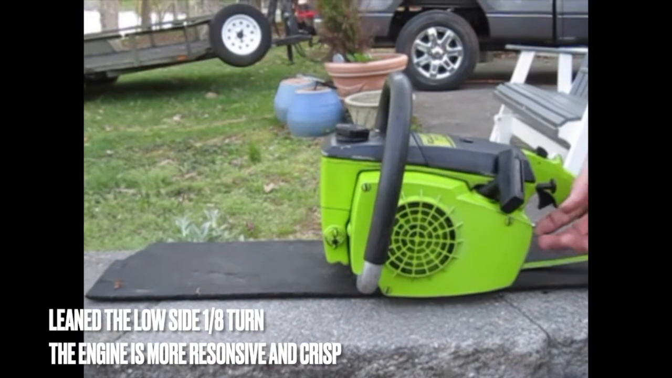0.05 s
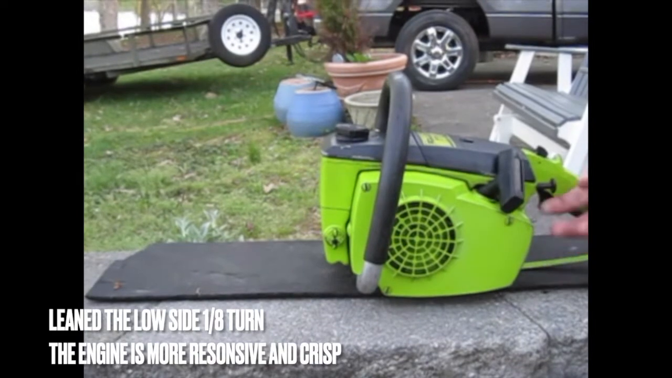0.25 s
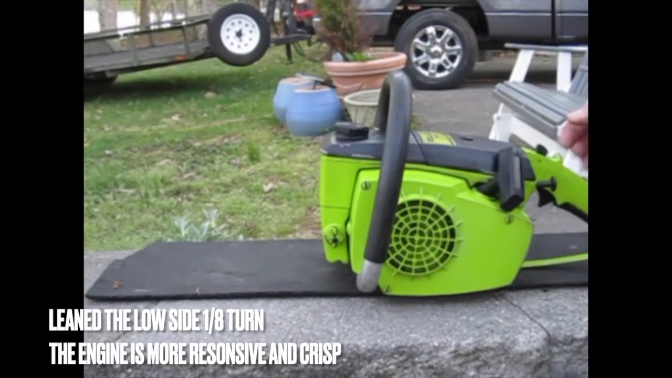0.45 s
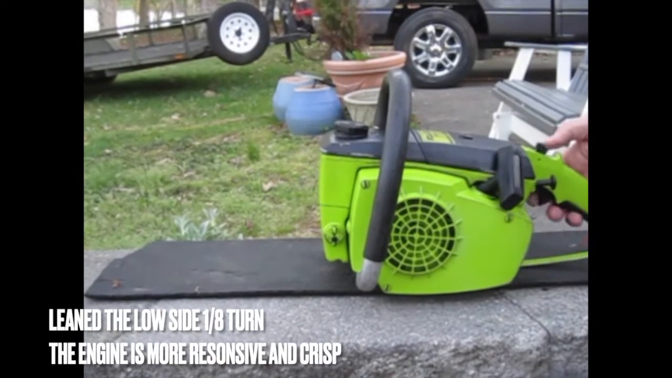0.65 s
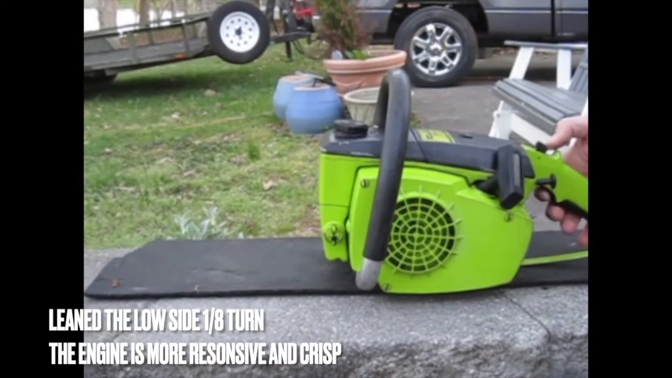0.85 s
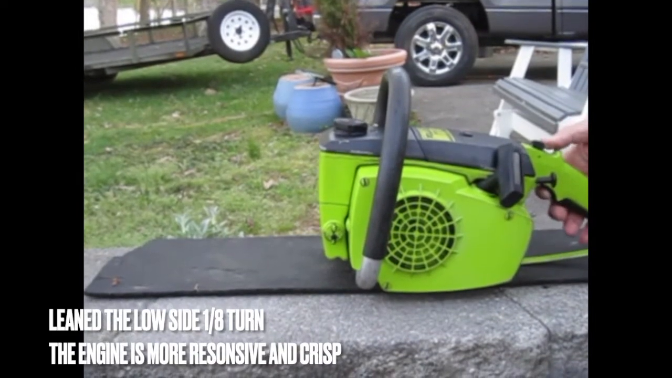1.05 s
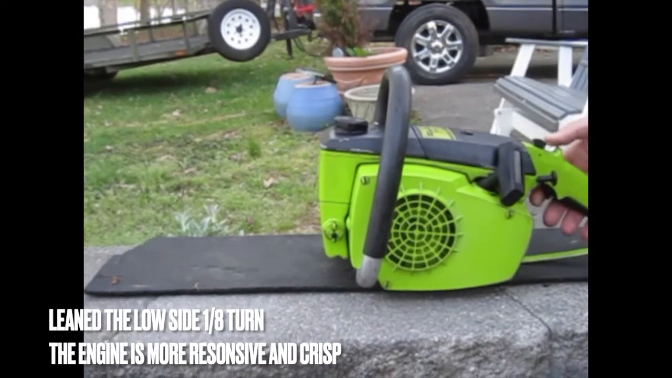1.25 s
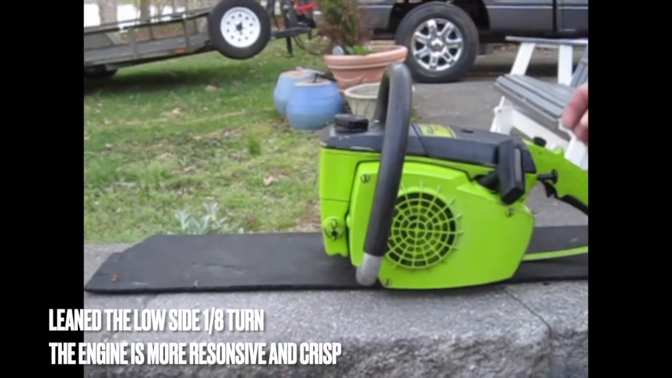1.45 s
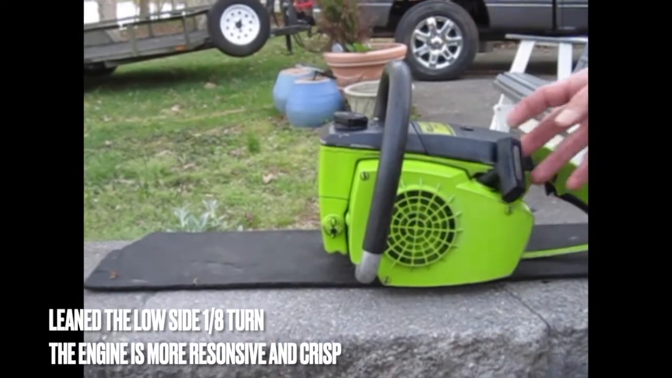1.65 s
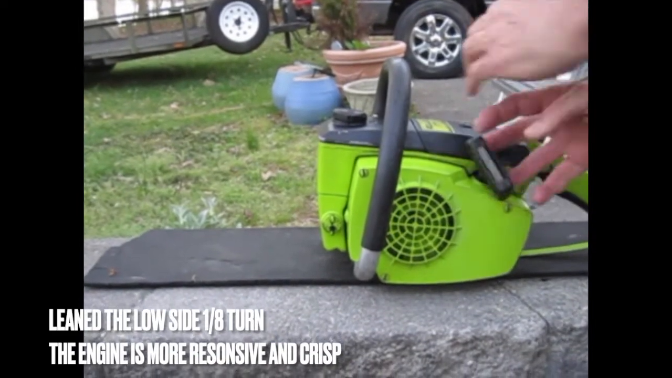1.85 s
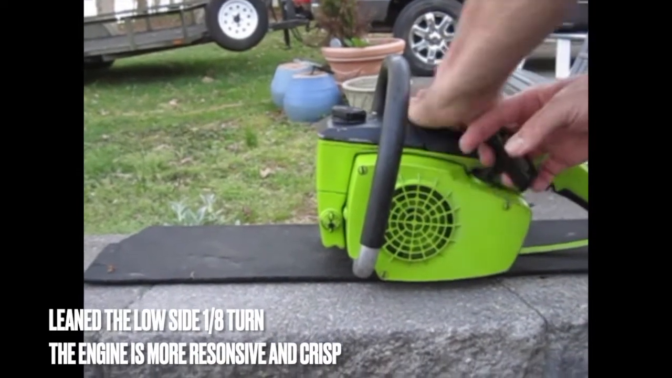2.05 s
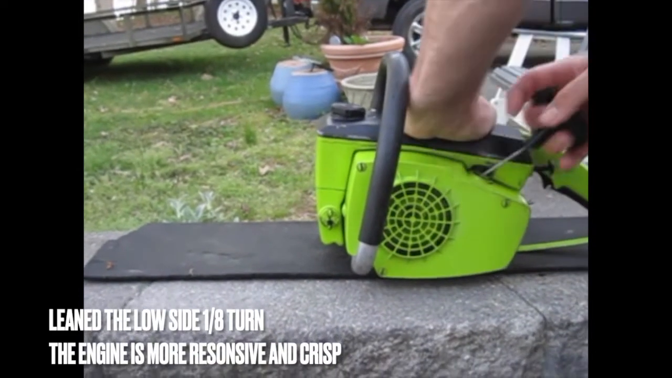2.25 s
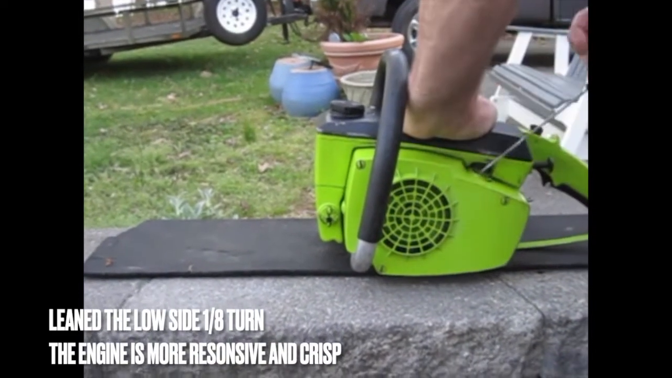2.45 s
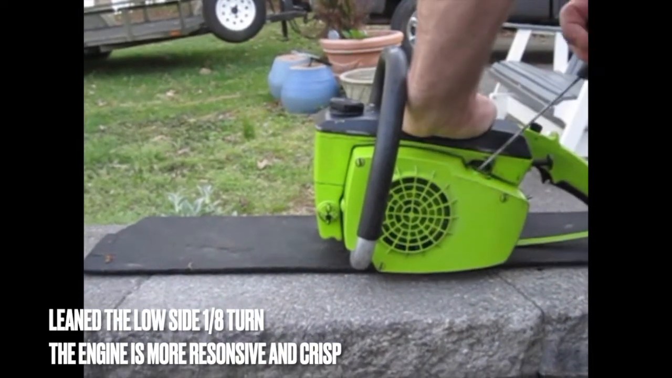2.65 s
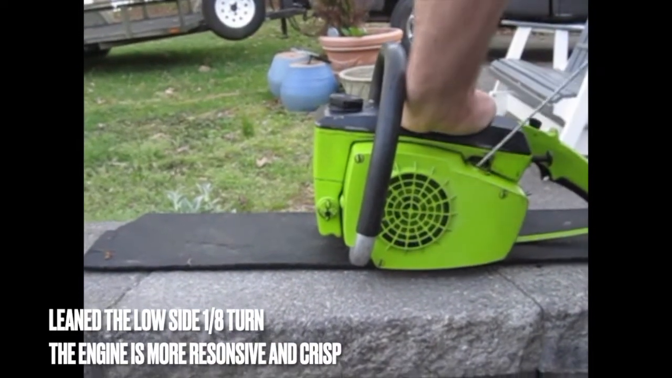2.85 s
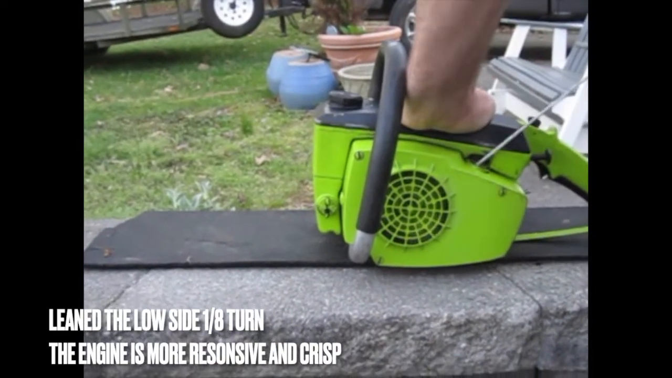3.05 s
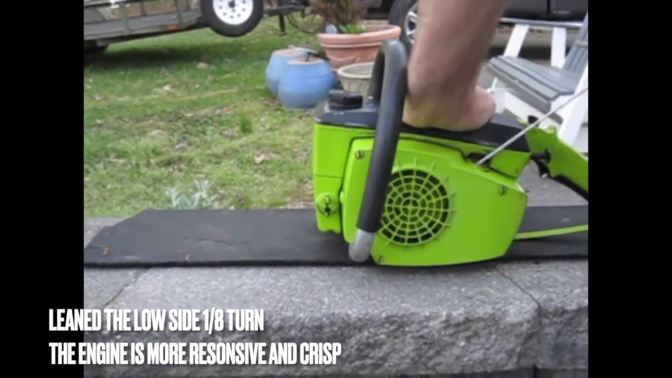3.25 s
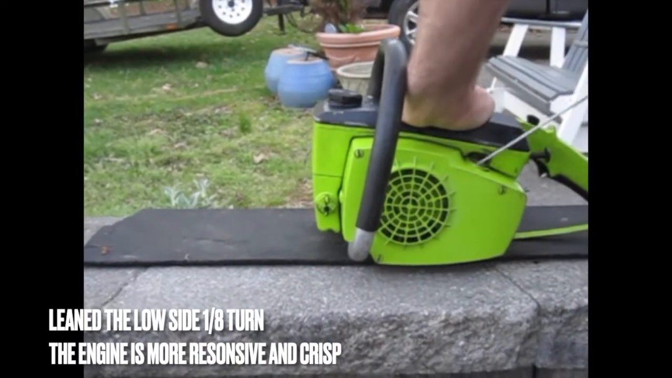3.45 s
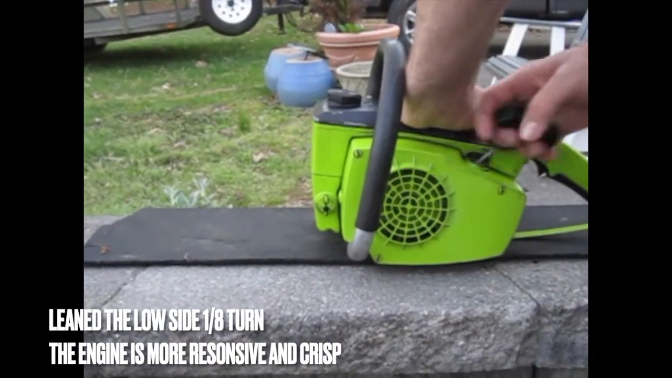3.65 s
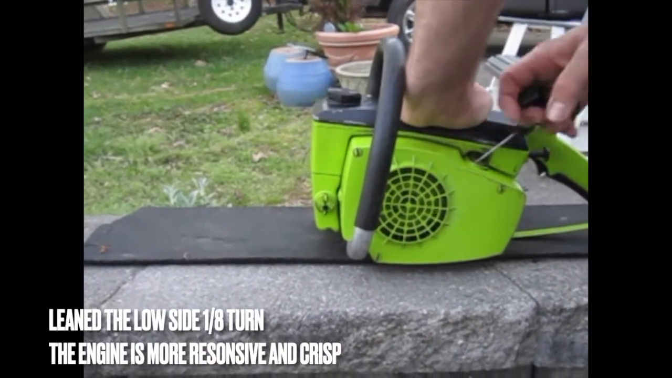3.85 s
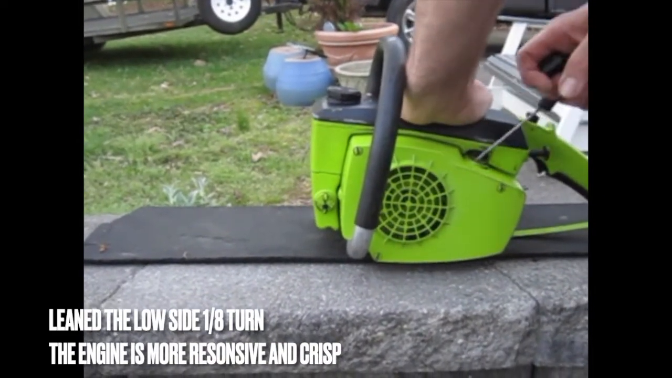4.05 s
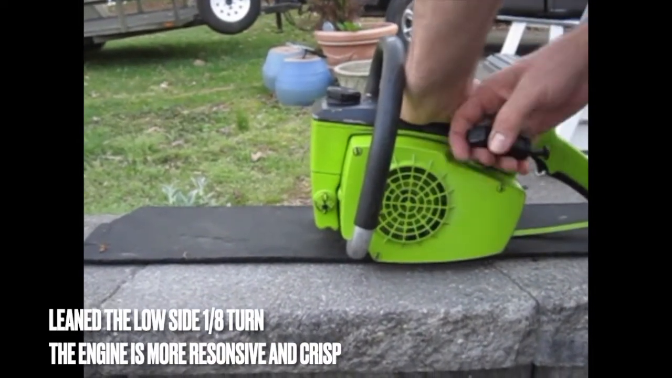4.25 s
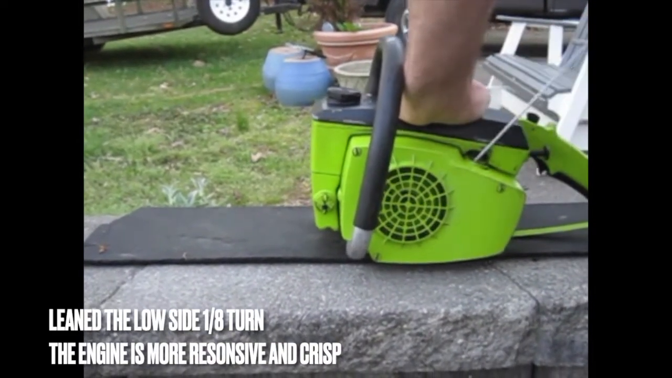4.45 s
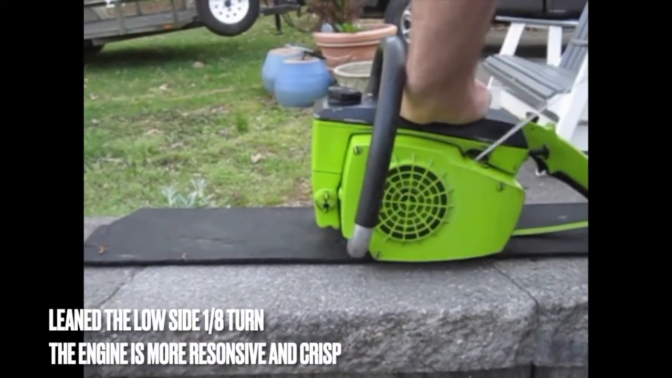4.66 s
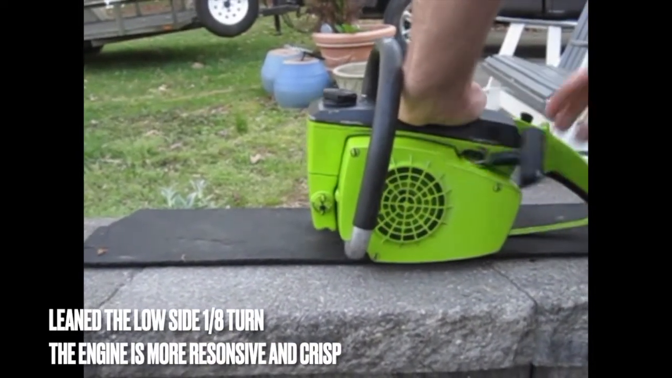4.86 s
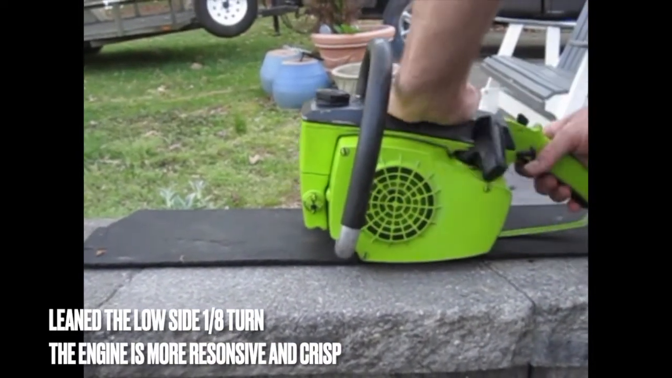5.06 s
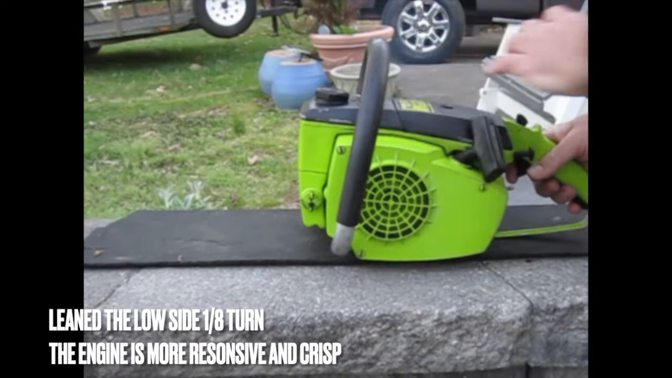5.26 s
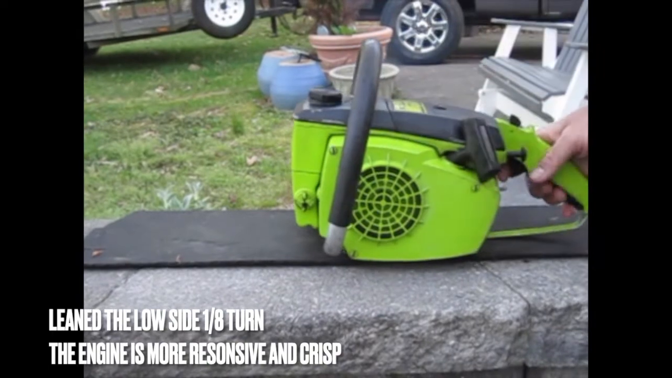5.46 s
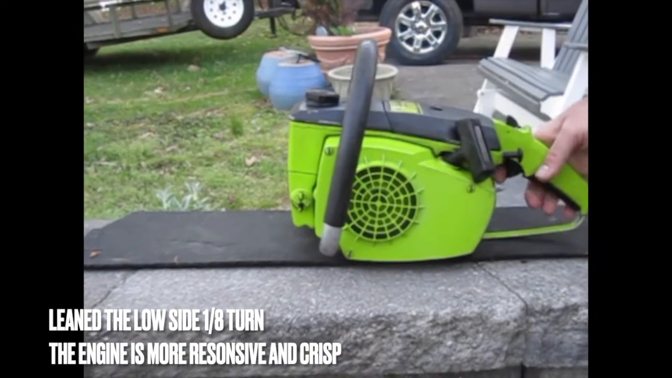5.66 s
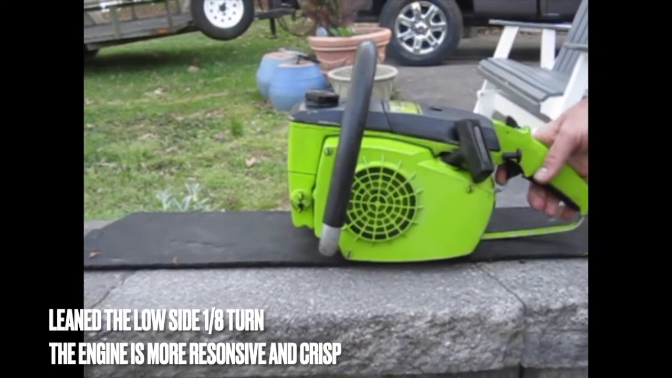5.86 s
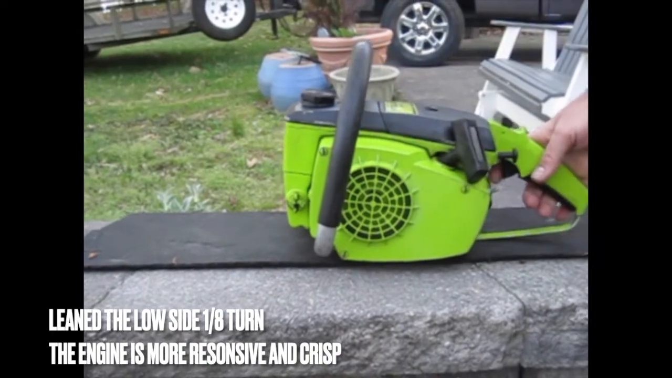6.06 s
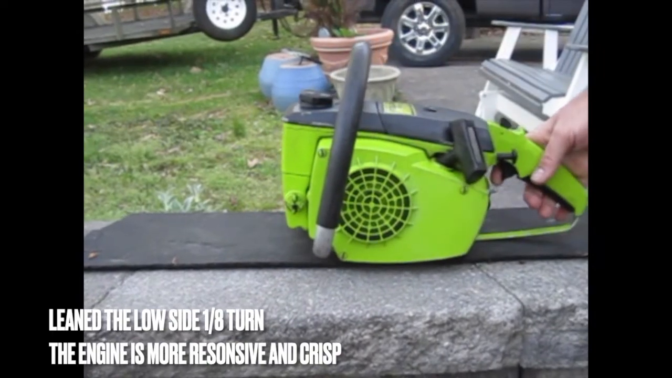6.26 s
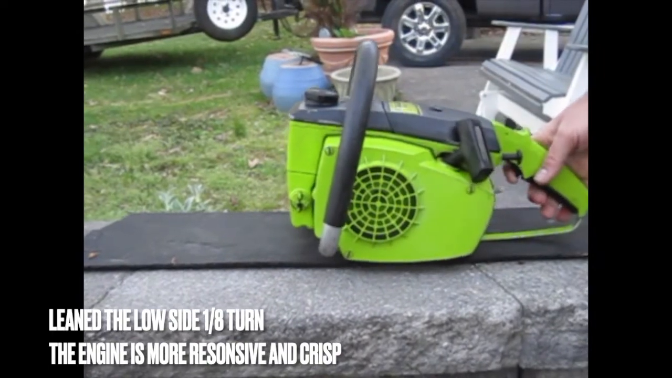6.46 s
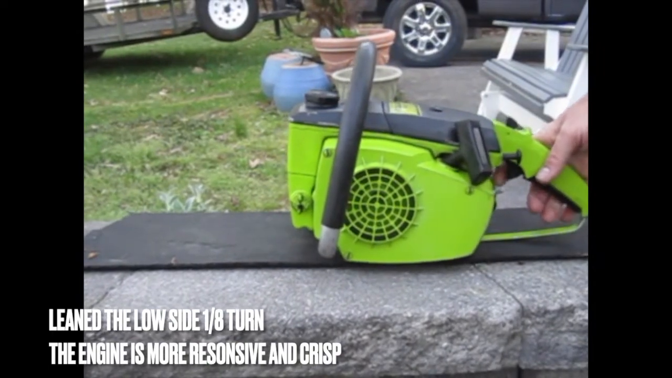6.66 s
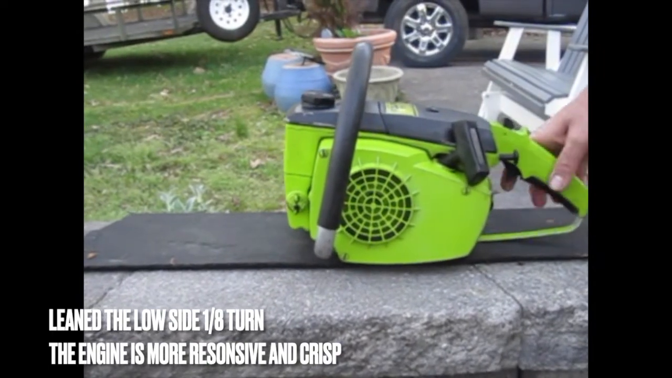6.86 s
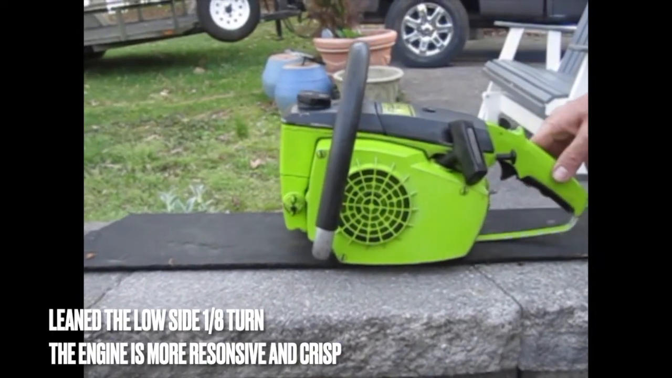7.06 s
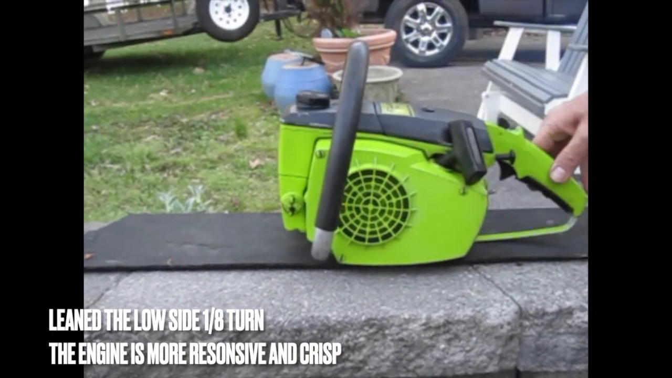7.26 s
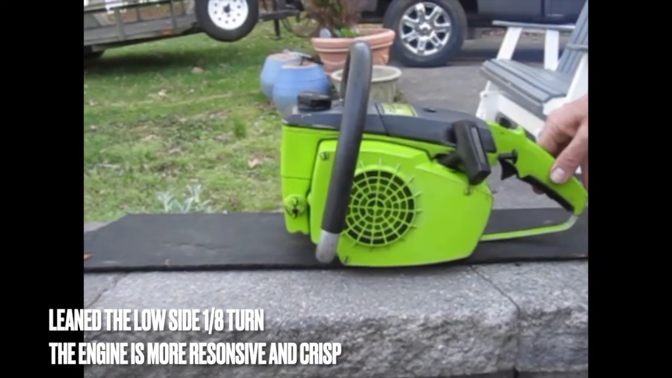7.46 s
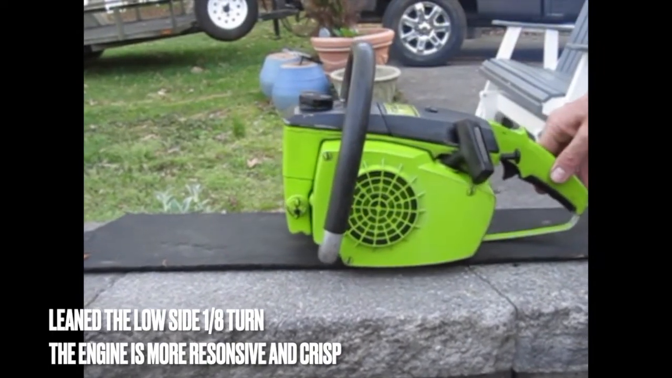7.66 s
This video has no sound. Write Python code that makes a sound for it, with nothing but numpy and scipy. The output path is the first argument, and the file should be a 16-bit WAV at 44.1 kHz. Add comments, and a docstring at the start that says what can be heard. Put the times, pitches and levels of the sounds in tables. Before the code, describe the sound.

In a quiet garden, close up, a few switch clicks and soft hand bumps come first. The starter handle knocks, the cord is eased out with dull compression puffs, then winds back with ratcheting ticks and hollow plastic clacks. A sharp yank fires a small two-stroke engine, which revs up raspy and buzzing with chain whine, coasts down, sputters and pops, takes a short throttle blip, then falls to an uneven idle.

```python
"""A small two-stroke chainsaw on a garden wall, in even outdoor air (shaped noise) with a far-off hum.
Switch clicks and hand bumps (noise bursts) come first; then the starter cord is eased out against compression
and let back with a clatter of drum and pawls (bursts into resonators), and pulled. The engine catches: pulses
locked to the crank excite muffler, crankcase and intake resonances, under hiss and chain whine. It revs up
four-stroking, coasts down popping, is blipped once more and sinks to a popping idle."""
import sys
import numpy as np
from scipy import signal
from scipy.fft import rfft, irfft, next_fast_len
from scipy.io import wavfile
from scipy.ndimage import uniform_filter1d

SR = 44100
rng = np.random.default_rng(int(sys.argv[2]) if len(sys.argv) > 2 else 0)


def store_pcm(level_fs):
    """Save levels as 16-bit WAV."""
    pcm = np.round(np.clip(level_fs, -1, 1) * 32767).astype(np.int16)
    wavfile.write(sys.argv[1], SR, np.atleast_2d(pcm).T)


N = 340011
TIME_S = np.arange(N) / SR

# outdoor air, spectrum shape: freq_hz, density_db
GARDEN = [(15, -43), (25, -9), (84, -3.5), (117, -3), (309, -5.5), (384, -8.5), (416, -5.5), (1040, -3.5),
          (1160, 0.5), (1700, -9), (1840, -4.5), (2000, -7.5), (2160, -8), (5140, -21), (16000, -34.5)]
# far-off machine hum: freq_hz, width_hz, level_db
FAR_HUM = [(1172, 40, -63), (1861, 18, -60), (2160, 40, -66)]
# dull reflections off wall and house: delay_s, level_db
ECHOES = [(.0083, -29.5), (0.0139, -19.5), (0.023, -23.5), (.036, -21.5), (0.072, -26)]
# soft bumps of the hands on the saw: time_s, drive_db
BUMPS = [(1.218, -35), (1.27, -69), (1.34, -55), (1.741, -44), (1.859, -43), (1.947, -34.5), (2.0, -57),
         (3.37, -45.5)]
# cord sliding through its eyelet: start_s, end_s, level_db
SLIDES = [(2.253, 2.37, -44), (2.767, 2.907, -43.5), (3.09, 3.176, -42), (3.352, 3.746, -49.5),
          (3.796, 4.19, -50), (4.409, 4.478, -37)]
# switch and grip clicks: time_s, body_db, bite_over_body_db, treble_over_body_db
CLICKS = [(.101, -34, 2, -19), (.166, -25, 7.5, 4), (.309, -25, -2.5, -20), (.317, -26.5, -5, -38),
          (.948, -41.5, 3, -14), (2.502, -26, -3.5, -29)]
# casing, spectrum shape: freq_hz, density_db
CASING = [(290, -50), (500, -11.5), (974, 7), (1130, 4), (1530, 6), (1790, -9.5), (2160, 0.5), (3590, -5.5),
          (5710, -9), (6230, -2), (8090, -14), (8580, -6.5), (9490, -14), (12300, -12.5), (16000, -29)]
# starter handle and drum knocks as the cord tightens or runs home; ring pitch set by where it hits:
# time_s, body_db, bite_over_body_db, treble_over_body_db, ring_hz, ring_db
CLACKS = [(1.705, -28, -10.5, -44, 967, -19.5), (2.057, -33, -4, -7, 1090, -44),
          (2.077, -17, -7, -12, 977, -16), (2.187, -24, -4.5, -12, 1340, -29),
          (2.294, -16, -2.5, -45, 790, -16.5), (2.763, -29, -7, -32, 1570, -36),
          (2.774, -12.5, -2, -37, 1493, -6), (3.007, -27, -17, -40, 950, -37),
          (3.02, -16, 5, -44, 1416, -12), (3.33, -25.5, 4, -8.5, 1125, -20),
          (3.355, -25, -2, -17, 1420, -30), (3.666, -31, -1, -13, 1150, -30),
          (3.737, -39, 0, -22, 1200, -32), (3.838, -13.5, -1.5, -9, 907, -18),
          (4.002, -17, -5, -54, 1053, -18), (4.009, -18, -6, -54, 1290, -17),
          (4.118, -30, -1.5, -16, 950, -31), (4.127, -30, -3, -16, 1320, -30),
          (4.255, -35, -4, -25.5, 1470, -36), (4.266, -37, -4, -20, 1080, -36),
          (4.386, -14, 2, 0, 1003, -17.5), (4.474, -34.5, 8, 6.5, 1210, -42)]
# pawls ticking over the ratchet as the cord winds back: time_s, body_db
PAWLS = [(3.405, -29), (3.46, -30), (3.514, -30), (3.577, -29), (3.675, -28.5)]
# steel ring modes of the starter: freq_hz, level_db, t60_s
STEEL = [(5592, -7, .12), (6184, -2, .2), (6627, -13, .55), (6912, -10, .08), (7677, -10, .2),
         (8721, -7, .08), (9215, -18, .3), (10207, -8, .11), (12678, -6, .09), (13550, -9, .09),
         (13895, -8, .14), (14116, -5, .1), (14320, -9, .08)]
# small steel parts pinging as the saw is gripped and the handle lifted: time_s, freq_hz, level_db, t60_s
PINGS = [(2.077, 6626, -39.5, .5), (2.077, 11700, -24, 0.028), (2.077, 13930, -36, .07),
         (2.187, 6850, -27, .03), (2.187, 7100, -31, .04), (2.187, 8020, -32, .03)]
# cord dragging the piston over compression: time_s, puff_db
COMPRESSIONS = [(2.322, -18.5), (2.807, -9.5), (3.109, -5), (4.419, -15.5)]
# piston rocking back, puffing and rattling the starter:
# time_s, puff_db, body_db, bite_over_body_db, treble_over_body_db
REBOUNDS = [(2.335, -22.5, -32, -9, -34), (2.366, -32, -28.5, -18, -42), (2.837, -28, -16.5, -5, -45),
            (2.86, -22, -28.5, -10, -25), (2.886, -22, -19, -14, -43), (3.135, -29, -18, 2.5, -31),
            (3.152, -18, -35, -12, -38), (3.16, -27, -19, -10, -44), (3.183, -20.5, -24, -5, -41),
            (3.199, -32, -31, -13, -43), (4.436, -20, -32, -6, -34)]
# muffler under a slow puff of cold air: freq_hz, width_hz, mode_db
COLD_MUFFLER = [(236, 290, -3.5), (373, 248, 0.5), (515, 105, 5.5), (712, 150, 0)]
# flywheel easing toward each new speed: start_s, target_rev_per_s, time_constant_s
STAGES = [(4.4917, 73.04, .063), (4.618, 149.54, .3168), (4.93, 136.42, .2362), (5.03, 155.11, .248),
          (5.205, 35.13, .7497), (5.85, 74.1, .4011), (5.92, 40.12, .4863), (6.488, 108.71, .0454),
          (6.6, 0, 1.331), (7.28, 52.18, .1964), (7.36, 12.88, .9708)]
# open throttle; combustion relative to the plain port puff, skip lost on every other turn:
# start_s, end_s, combustion_db, skip_db
THROTTLE = [(4.48, 4.556, 9, -1), (4.659, 5.03, 4.5, -10.5), (5.042, 5.207, 3, -13), (6.482, 6.594, 5, -9)]
# loud idle pops; combustion relative to the plain port puff: time_s, combustion_db, kick_rev_per_s
POPS = [(5.853, 8.5, 2.35), (5.866, 4.5, 0), (5.99, -11, 0.023), (6.021, 2, 0), (6.077, 4.5, 0.11),
        (6.122, 5.5, 0), (6.183, 3, 0.12), (6.233, 1.5, 0.031), (6.267, -3, 0), (6.283, 1, 0.025),
        (6.301, 1, 0.069), (6.318, 2.5, 0.02), (6.373, 5.5, 0), (6.391, 2, 0.055), (6.429, 7.5, 1.84),
        (6.465, 8.5, 2.03), (6.922, -4, 0.039), (6.973, -0.5, 0), (7.02, -2, 0.047), (7.08, 4.5, 0.058),
        (7.134, 3, 0.02), (7.192, 0, 0.033), (7.208, 4.5, 0), (7.285, 9, 2), (7.385, 3.5, 0),
        (7.42, 1.5, 0.18), (7.456, 1.5, 0.048), (7.493, -0.5, 0), (7.512, 1, 0.036), (7.55, 0, 0.043),
        (7.57, 8, 1.75), (7.652, 10, 2.43)]
# loudness by crank speed, throttle shut: speed_rev_per_s, exhaust_db, hiss_db
LOUDNESS = [(49, -19.5, -41.5), (69, -20.5, -41.5), (89.7, -23, -35), (99.5, -24, -34.5), (125, -24, -32),
            (131, -23.5, -29)]
# fan and chain hiss, spectrum shape: freq_hz, density_db
HISS = [(2060, -12.5), (3300, 4.5), (3850, -2.5), (4750, -6.5), (5330, -3.5), (5780, -5), (6650, -2),
        (7750, -7.5), (8360, -6.5), (9200, -10), (9990, -10.5), (10900, -11), (11550, -10.5), (12600, -19),
        (13300, -21), (14050, -18), (14700, -21), (16000, -42)]
# chain whine on multiples of the tooth rate, from the second up: level_db
WHINE_DB = [-39.5, -45, -52, -51]
# intake rasp, strongest coasting against a shut throttle: time_s, level_db
RASP = [(4.5, -36.5), (4.63, -35), (4.69, -29.5), (4.76, -30), (4.85, -33), (5.0, -36.5), (5.13, -30.5),
        (5.35, -28.5), (5.45, -26.5), (5.7, -25), (5.96, -33.5), (6.42, -34.5), (6.51, -29), (6.68, -25),
        (6.92, -28), (7.03, -34), (7.7, -35)]
# carburettor throat behind the reed valve: freq_hz, width_hz, mode_db
INTAKE = [(1402, 67, 13), (2050, 170, 8), (2593, 220, 9.5), (3120, 124, 3.5), (4000, 120, -2.5)]
# muffler as the exhaust port opens: freq_hz, width_hz, mode_db
MUFFLER = [(252, 102, 3), (531, 106.5, 12.5), (690.3, 105.5, 14.5), (1168, 235, 3.5), (1546, 97, -1),
           (2160, 300, -32), (2660, 250, -40)]
# crankcase as the transfer ports close: freq_hz, width_hz, mode_db
CRANKCASE = [(552, 166, 9.5), (699, 77, 16), (914, 124, 2.5), (1310, 150, 5)]
# muffler under a burnt charge: freq_hz, width_hz, mode_db
BANG = [(252, 73, 11), (580, 129, 21), (845, 132, 15), (1150, 200, 8), (2570, 720, -46)]
# muffler filled with hot gas under throttle: freq_hz, width_hz, mode_db
HOT_BANG = [(286, 68, 1), (606, 183, 19.5), (897, 132, 15), (1350, 250, -26), (2550, 910, -11)]
# overtones of the hardest, steepened bangs: freq_hz, width_hz, mode_db
CRACK = [(1290, 183, 11.5), (1990, 460, -4)]

GARDEN_DB, CUTOFF_HZ = -48, 15900
SLIDE_RISE_DB_PER_S, SLIDE_FALL_DB_PER_S = 111, 226
CLICK_T60_S, CLACK_T60_S, PAWL_T60_S = .017, .017, .016
PAWL_BITE_DB, PAWL_TREBLE_DB = 6, 10
PAWL_RING_HZ, PAWL_RING_DB = 1140, -27
HOUSING_WIDTH_HZ, HOUSING_OVERTONE_RATIO, HOUSING_OVERTONE_DB = 43, 1.48, -6.5
SPRING_S, SPRING_HZ, SPRING_DB, SPRING_T60_S = 4.385, 3080, -32.41, .27
CORD_OUT_S = 2.25
FIRST_FIRING_S, FIRST_FIRING_DB = 4.4609, -2.5
CATCH_REV_PER_S, KICK_S = 39, .05
SPROCKET_TEETH, CLUTCH_REV_PER_S = 6, 75
OPEN_EXHAUST_DB, OPEN_HISS_DB, THROTTLE_MOVE_S = 2.5, -4, .18
REED_OPEN_S = .00187


def from_db(db):
    """Amplitude ratio of a level in dB."""
    return 10 ** (np.asarray(db) / 20)


def rms_one(x):
    """Scale to rms 1."""
    return x / np.sqrt(np.mean(x ** 2) + 1e-20)


def noise():
    """White noise, rms 1."""
    return rng.standard_normal(N)


def cut(x, hz, kind, order=2):
    """Butterworth low-, high- or band-pass."""
    sos = signal.butter(order, hz, kind, fs=SR, output="sos")
    return signal.sosfilt(sos, x + 1e-18)


def coloured(x, spectrum):
    """Noise given a smooth spectrum; rms 1."""
    hz, db = np.transpose(spectrum)
    size = next_fast_len(N)
    log_hz = np.log(np.fft.rfftfreq(size, 1 / SR) + 1)
    gain = from_db(np.interp(log_hz, np.log(hz), db))
    return rms_one(irfft(rfft(x, size) * gain, size)[:N])


def clicks(times_s, sizes):
    """Impulses, each shared between its two nearest samples."""
    out = np.zeros(N)
    at = np.clip(np.asarray(times_s) * SR, 0, N - 2)
    np.add.at(out, at.astype(int), sizes * (1 - at % 1))
    np.add.at(out, at.astype(int) + 1, sizes * (at % 1))
    return out


def resonate(x, modes):
    """Parallel two-pole resonances of alternating sign."""
    out = 0
    for k, (hz, width_hz, db) in enumerate(modes):
        r = np.exp(-np.pi * width_hz / SR)
        zeros = [(1 - r * r) / 2, 0, (r * r - 1) / 2]
        poles = [1, -2 * r * np.cos(2 * np.pi * hz / SR), r * r]
        out = out + (-1) ** k * from_db(db) * signal.lfilter(zeros, poles, x + 1e-18)
    return out


def cavity(x, modes, low_hz=165):
    """A small opening radiates no bass; a unit impulse gives a pulse of height 1."""
    unit = cut(resonate(signal.unit_impulse(2048), modes), low_hz, "high", order=4)
    return cut(resonate(x, modes), low_hz, "high", order=4) / np.abs(unit).max()


def dying(x, t60_s):
    """Each impulse starts an exponential decay of its own height."""
    return signal.lfilter([1], [1, -from_db(-60 / (t60_s * SR))], x + 1e-18)


def ring(x, hz, t60_s):
    """A unit impulse sets a decaying sine of height 1 ringing."""
    r, w = from_db(-60 / (t60_s * SR)), 2 * np.pi * hz / SR
    return signal.lfilter([0, np.sin(w)], [1, -2 * r * np.cos(w), r * r], x + 1e-18)


def evened(x, span_s=.15):
    """Slow rms held at 1 once the engine has caught, single strokes keeping their contrast."""
    size = int(span_s * SR)

    def mean(v):
        return uniform_filter1d(uniform_filter1d(v, size), size)

    running = (TIME_S > STAGES[0][0]) * 1.
    return x * np.sqrt((np.abs(mean(running)) + 1e-9) / (np.abs(mean(x * x)) + 1e-9))


def garden():
    """Even outdoor air (shaped noise) with a far-off hum (narrow noise bands)."""
    hum = sum(from_db(db) * rms_one(resonate(noise(), [(hz, width_hz, 0)])) for hz, width_hz, db in FAR_HUM)
    return from_db(GARDEN_DB) * coloured(noise(), GARDEN) + hum


def echoes(x, dull_hz=3500):
    """A few delayed, dulled reflections."""
    dull = cut(x, dull_hz, "low", order=1)
    return sum(from_db(db) * np.interp(TIME_S - s, TIME_S, dull, left=0) for s, db in ECHOES)


def handling():
    """The cord rubs through its eyelet, swelling and dying away; hands bump dully on the saw."""
    rub = 0
    for start, end, db in SLIDES:
        rise_db = SLIDE_RISE_DB_PER_S * np.maximum(start - TIME_S, 0)
        fall_db = SLIDE_FALL_DB_PER_S * np.maximum(TIME_S - end, 0)
        rub = rub + from_db(db - rise_db - fall_db)
    cord = rub * coloured(cut(noise(), 3300, "low", order=1), CASING)
    s, db = np.transpose(BUMPS)
    push = cut(dying(clicks(s, from_db(db)), .22), 49, "low", order=1)
    return cord + push * rms_one(cut(noise(), [55, 240], "band"))


def knocks(rows, t60_s, gain_db, high_share, high_db, lead_db, lead_t60_s, tail_db, tail_t60_s, rise_hz,
           edge_share=.21, edge_db=-4, bite_db=-1.5):
    """Each contact scuffs in, then is a short burst of chatter in the casing with a faint longer tail."""
    s, body, bite, treble = np.transpose(rows)
    bands_hz = [[600, 1800], [1800, 3400], [3400, 5500], [5500, 10000], [10000, 15500]]
    edge = bite + edge_share * (treble - bite) + edge_db
    high = bite + high_share * (treble - bite) + high_db
    colours_db = [0, bite + bite_db, edge, high, treble]
    out, chatter = np.zeros(N), coloured(noise(), CASING)
    for band_hz, colour_db in zip(bands_hz, colours_db):
        blows = clicks(s, from_db(body + colour_db + gain_db))
        scuff = from_db(lead_db) * dying(blows[::-1], lead_t60_s)[::-1]  # reversed decay: swells in
        force = scuff + dying(blows, t60_s) + from_db(tail_db) * dying(blows, tail_t60_s)
        grains = cut(np.roll(chatter, rng.integers(N)), band_hz, "band", order=3)
        out += cut(force, rise_hz, "low", order=1) * rms_one(grains)
    return out


def switch():
    """Switch and grip clicks: short bursts of casing chatter."""
    return knocks(CLICKS, CLICK_T60_S, gain_db=-2, high_share=1, high_db=8.5, lead_db=-39, lead_t60_s=.012,
                  tail_db=-19, tail_t60_s=.11, rise_hz=400)


def steel_ring(rows, ring_db, hardest_db, uneven_db=3.5):
    """Bright blows set the steel of the starter ringing, each mode with a strength of its own."""
    s, body, _, treble = np.transpose(rows)
    force_db = np.minimum(body + treble, hardest_db) + ring_db
    on_sample_s = np.round(s * SR) / SR
    out = 0
    for hz, db, t60_s in STEEL:
        strength = from_db(force_db + db + uneven_db * rng.standard_normal(len(s)))
        out = out + ring(clicks(on_sample_s, strength), hz, t60_s)
    return out


def housing(s, hz, db):
    """One hollow knock of the plastic starter housing: a short ring and its overtone."""
    overtone = (hz * HOUSING_OVERTONE_RATIO, HOUSING_WIDTH_HZ, HOUSING_OVERTONE_DB)
    return cavity(clicks([s], from_db(db)), [(hz, HOUSING_WIDTH_HZ, 0), overtone], low_hz=500)


def recoil_spring():
    """The spring sings as the cord is yanked: a narrow noise band dying away."""
    tone = rms_one(resonate(noise(), [(SPRING_HZ, 60, 0)]))
    return dying(clicks([SPRING_S], from_db(SPRING_DB)), SPRING_T60_S) * tone


def starter(bounce_s=.0127, bounce_db=-3, housing_db=1):
    """Drum clacks in the housing, pawls tick and ring, and all rattles as the piston rebounds."""
    clacks = [row[:4] for row in CLACKS]
    ticks = [(s, db, PAWL_BITE_DB, PAWL_TREBLE_DB) for s, db in PAWLS]
    bounces = [(s + bounce_s, db + bounce_db, -9, -18) for s, db in PAWLS]
    rebounds = [(s, *rest) for s, _, *rest in REBOUNDS]
    spring = recoil_spring()
    drum = knocks(clacks, CLACK_T60_S, gain_db=-1.5, high_share=.36, high_db=-3, lead_db=-14.5,
                  lead_t60_s=.049, tail_db=-8.5, tail_t60_s=.073, rise_hz=268)
    pawls = knocks(ticks, PAWL_T60_S, gain_db=1, high_share=.73, high_db=2, lead_db=-36,
                   lead_t60_s=.061, tail_db=-11, tail_t60_s=.055, rise_hz=400)
    rattle = knocks(rebounds + bounces, .041, gain_db=-1.5, high_share=.75, high_db=10.5, lead_db=-15,
                    lead_t60_s=.034, tail_db=-26, tail_t60_s=.11, rise_hz=160)
    hollow = [(s, hz, db) for s, *_, hz, db in CLACKS]
    hollow += [(s, PAWL_RING_HZ, PAWL_RING_DB) for s, _ in PAWLS]
    plastic = sum(housing(s, hz, db + housing_db) for s, hz, db in hollow)
    late_clacks = [row for row in clacks if row[0] > CORD_OUT_S]
    steel = steel_ring(ticks, ring_db=-11.5, hardest_db=-17)
    steel = steel + steel_ring(late_clacks, ring_db=.5, hardest_db=-47)
    pings = sum(ring(clicks([round(s * SR) / SR], from_db(db)), hz, t60_s) for s, hz, db, t60_s in PINGS)
    return drum + pawls + rattle + spring + plastic + steel + pings


def cranking(tail_db=-46, crack_db=-20):
    """Air let out of the cylinder thumps through the muffler and sighs away; the first firing cracks."""
    rows = list(COMPRESSIONS) + [(s, db) for s, db, *_ in REBOUNDS] + [(FIRST_FIRING_S, FIRST_FIRING_DB)]
    s, db = np.transpose(rows)
    puffs = clicks(s, from_db(db))
    sigh = from_db(tail_db) * noise() * dying(puffs, .08)
    crack = from_db(crack_db) * cavity(clicks(s, from_db(db) ** 3), CRACK)  # cubed: favours hard puffs
    return cavity(puffs + sigh, COLD_MUFFLER, low_hz=87.5) + crack


def throttle(s):
    """1 while the trigger is held, else 0."""
    return sum(((s >= start) & (s < end)) * 1. for start, end, *_ in THROTTLE)


def crank():
    """Flywheel speed in rev/s, turns made since the engine caught, and the number of each turn."""
    speed = np.full(N, float(CATCH_REV_PER_S))
    for s, target, lag_s in STAGES:
        at = int(s * SR)
        speed[at:] = target + (speed[at] - target) * np.exp(-TIME_S[:N - at] / lag_s)
    for s, _, kick in POPS:
        at = int(s * SR)
        speed[at:] += kick * np.exp(-TIME_S[:N - at] / KICK_S)
    turns = np.cumsum(speed) / SR
    turns = turns - np.interp(STAGES[0][0], TIME_S, turns)
    return speed, turns, np.arange(int(turns[-1]) + 1)


def hiss(turns, depth=.19, grain_db=12, ticks_per_s=1500, tick_share=.53):
    """Cooling air and chain links ticking along the bar, swelling at each exhaust opening."""
    tick_gain = from_db(grain_db * np.minimum(rng.exponential(1, N), 4))
    ticks = (rng.random(N) < ticks_per_s / SR) * noise() * tick_gain
    air = coloured(noise() + tick_share * rms_one(ticks), HISS)
    return rms_one(air * (1 + depth * np.cos(2 * np.pi * (turns + .0067))))


def chain(speed, turns, wander_rad=1, flutter_db=2):
    """Once the clutch grips, links mesh with the sprocket: a fluttering whine that follows the crank."""
    def slow():
        return rms_one(cut(noise(), 18, "low"))

    grip = np.clip((speed - CLUTCH_REV_PER_S) / 20, 0, 1)
    whine = 0
    for k, db in enumerate(WHINE_DB, 2):
        level = from_db(db + flutter_db * slow())
        whine = whine + level * np.sin(2 * np.pi * SPROCKET_TEETH * k * turns + wander_rad * slow())
    return grip * whine


def intake(turns, count, intake_db, lift_turn=.46, lift_db=-4.5, rattle_db=-32):
    """Once a turn the reed lifts, then slaps shut: a hollow double pulse, clearest under strong suction."""
    lifts_s = np.interp(count + lift_turn, turns, TIME_S) + rng.normal(0, .000016, len(count))
    suction = from_db(np.clip(intake_db + 29, -7, 6))
    strokes = suction * clicks(lifts_s, from_db(rng.normal(0, .97, len(count))))
    rattle = from_db(rattle_db) * noise() * (1 + .6 * np.cos(2 * np.pi * (turns - .7)))
    air = strokes + rattle
    reed = from_db(lift_db) * air + np.roll(air, int(REED_OPEN_S * SR))
    return evened(cut(cavity(reed, INTAKE), 860, "high", order=3))


def combustion(opens_s, misfire_db=-19, scatter_db=6.5, uneven_db=-.1):
    """Burn per turn: rich under throttle it fires hard only every other turn; near idle it pops at times."""
    burn = from_db(misfire_db + rng.normal(0, scatter_db, len(opens_s)))
    odd = np.arange(len(opens_s)) % 2
    for start, end, db, skip_db in THROTTLE:
        held = (opens_s >= start) & (opens_s < end)
        burn += held * from_db(db + skip_db * odd + uneven_db * rng.standard_normal(len(opens_s)))
    for s, db, _ in POPS:
        burn[np.abs(opens_s - s).argmin()] = from_db(db)
    return burn


def exhaust(speed, turns, count, burn_lag_s=.00061, transfer_turn=.374, transfer_db=-5, fast_transfer_db=-4,
            wander_turn=.013, crack_db=-14, thump_db=-29, jet_db=-36, hot_db=3, idle_puff_db=-2):
    """A puff as the port opens, a bang if the charge burnt, a second puff over a third of a turn later."""
    rev_per_s = np.interp(count, turns, speed)
    slow = np.clip((85 - rev_per_s) / 30, 0, 1)
    # the slower the flywheel, the less evenly it turns
    stagger_s = rng.normal(0, 1, len(count)) * (.00002 + .00013 * slow)

    def opening_s(turn):
        return np.interp(count + turn, turns, TIME_S) - .0022 + stagger_s

    def uneven():
        return from_db(rng.normal(0, .8 + .7 * slow))

    opens_s = opening_s(0)
    burn = combustion(opens_s)
    fires_s = opens_s + burn_lag_s + rng.normal(0, .00004, len(count))
    puffs = clicks(opens_s, uneven() * from_db(idle_puff_db * slow))
    bangs = clicks(fires_s, burn)
    # the second puff wanders at idle, and is weak at speed and after a bang
    late_turn = wander_turn * slow * rng.standard_normal(len(count))
    fast = np.clip(rev_per_s / 90 - 1, 0, 1) * 2
    transfer_size = from_db(transfer_db + fast_transfer_db * fast) * uneven() / (1 + burn ** 2)
    transfer = clicks(opening_s(transfer_turn + late_turn), transfer_size)
    # burnt gas leaves as a turbulent jet, a plain puff with less
    jet = from_db(jet_db) * noise() * dying(bangs + .35 * puffs, .03)
    # the hardest idle bangs steepen into a crack
    steep = clicks(fires_s, burn ** 2 * (1 - .75 * throttle(opens_s)))
    crack = from_db(crack_db) * cavity(steep, CRACK)
    # every bang pushes a little bass out of the pipe
    thump = from_db(thump_db) * cavity(bangs, [(126, 220, 0)], low_hz=75.4)
    hot = clicks(fires_s, burn * throttle(opens_s) * (1 - slow))
    roar = cavity(bangs - hot, BANG) + from_db(hot_db) * cavity(hot, HOT_BANG)
    return evened(cavity(puffs + jet, MUFFLER) - cavity(transfer, CRANKCASE) - roar - crack - thump)


def engine(fan_db=-14, rumble_db=-68):
    """The running saw, timed by the crank; speed and throttle set the exhaust and hiss levels."""
    speed, turns, count = crank()
    speeds, shut_exhaust_db, shut_hiss_db = np.transpose(LOUDNESS)
    # an open throttle strengthens the exhaust and softens the hiss
    held = uniform_filter1d(throttle(TIME_S), int(THROTTLE_MOVE_S * SR))
    exhaust_db = np.interp(speed, speeds, shut_exhaust_db) + OPEN_EXHAUST_DB * held
    hiss_db = np.interp(speed, speeds, shut_hiss_db) + OPEN_HISS_DB * held
    intake_db = np.interp(TIME_S, *np.transpose(RASP))
    running = np.clip(turns + 1, 0, 1)  # fades in over the turn before the catch
    fan = from_db(hiss_db + fan_db) * rms_one(cut(noise(), [1000, 4500], "band"))
    rumble = from_db(rumble_db) * rms_one(cut(noise(), [35, 200], "band"))
    return running * (from_db(exhaust_db) * exhaust(speed, turns, count)
                      + from_db(intake_db) * intake(turns, count, intake_db)
                      + from_db(hiss_db) * hiss(turns) + chain(speed, turns) + fan + rumble)


def scene():
    """The saw with its echoes in the garden air."""
    saw = engine() + cranking() + switch() + starter() + handling()
    return (saw + echoes(saw) + garden())[None]


def record(dry, top=.52):
    """The tallest peaks are flattened, then the top treble is cut."""
    limited = dry / (1 + (dry / top) ** 6) ** (1 / 6)
    return signal.sosfilt(signal.ellip(10, .2, 90, CUTOFF_HZ, fs=SR, output="sos"), limited)


dry = scene()
out = record(dry)
store_pcm(out)
```